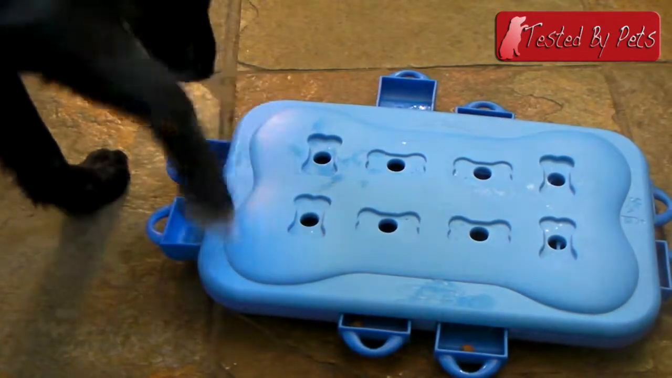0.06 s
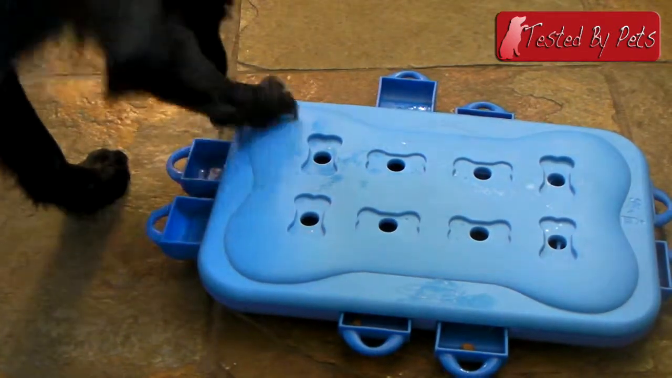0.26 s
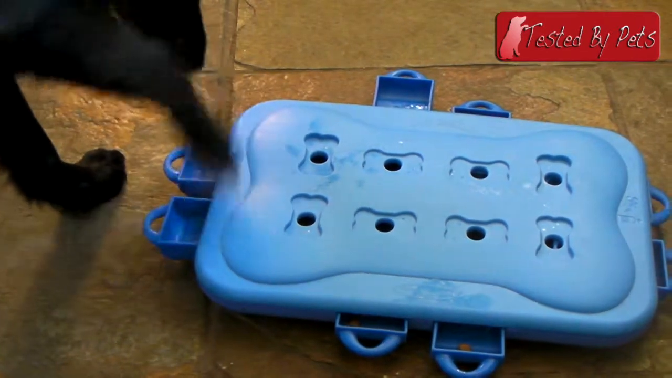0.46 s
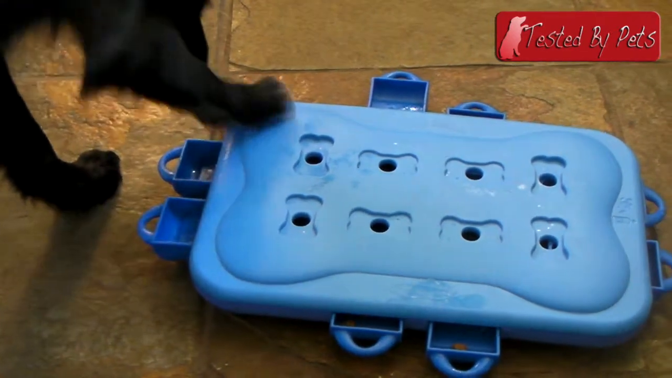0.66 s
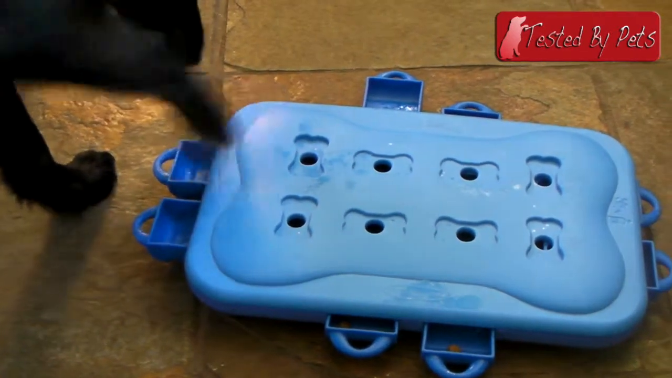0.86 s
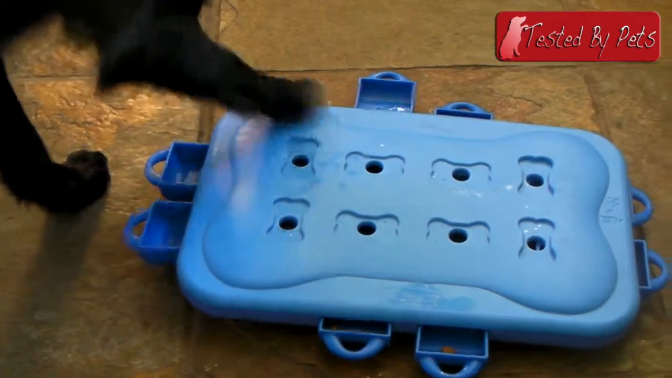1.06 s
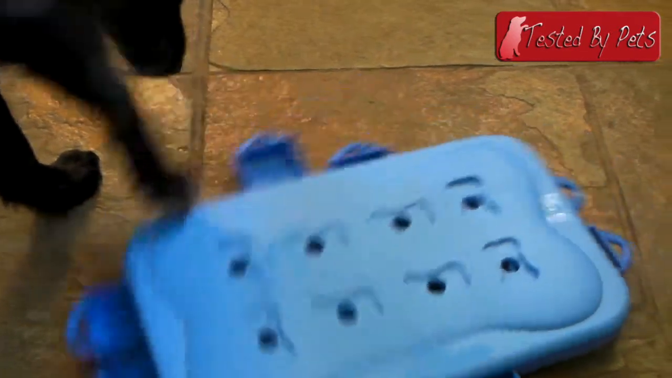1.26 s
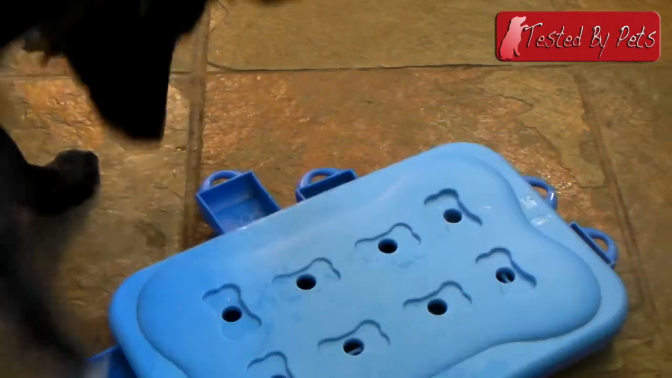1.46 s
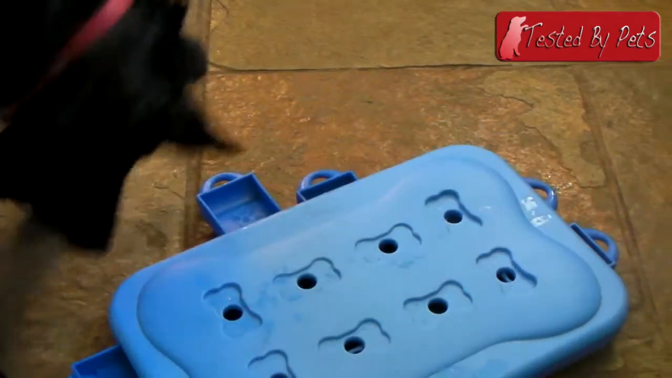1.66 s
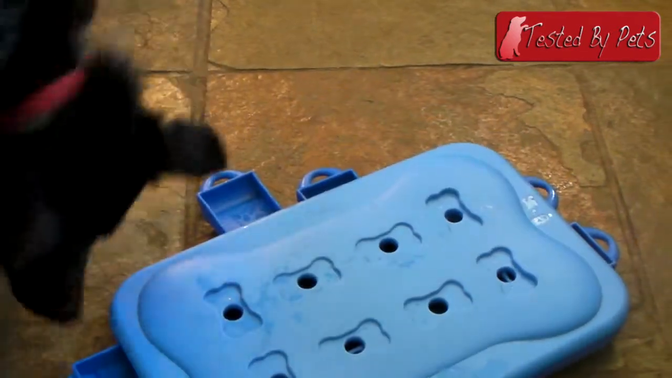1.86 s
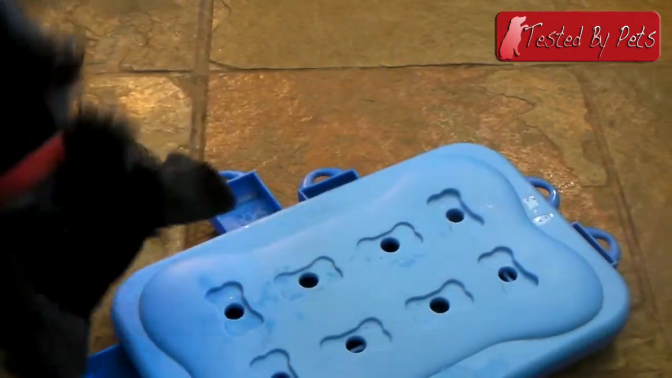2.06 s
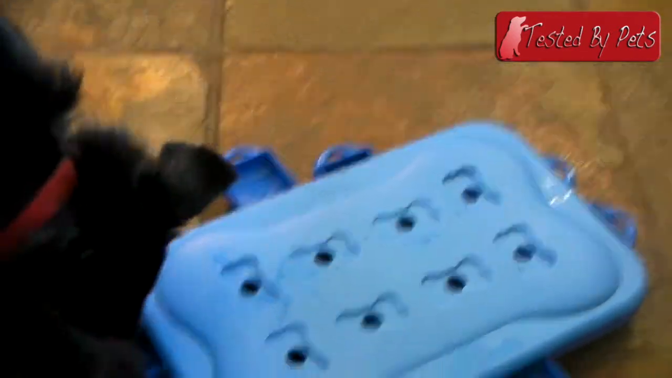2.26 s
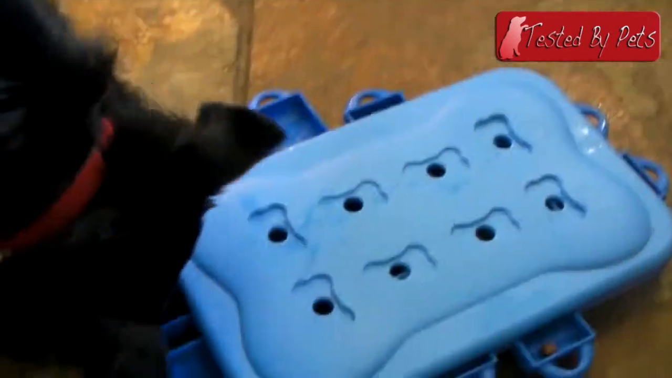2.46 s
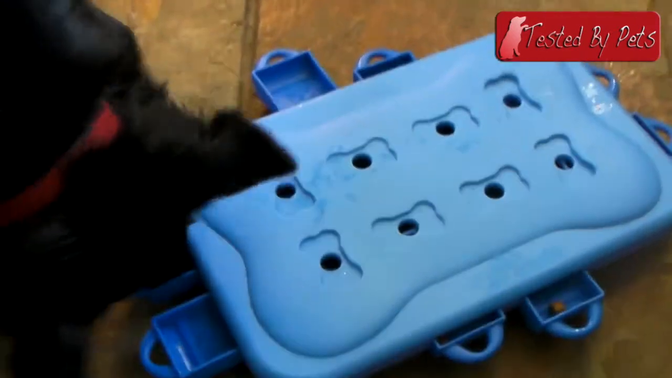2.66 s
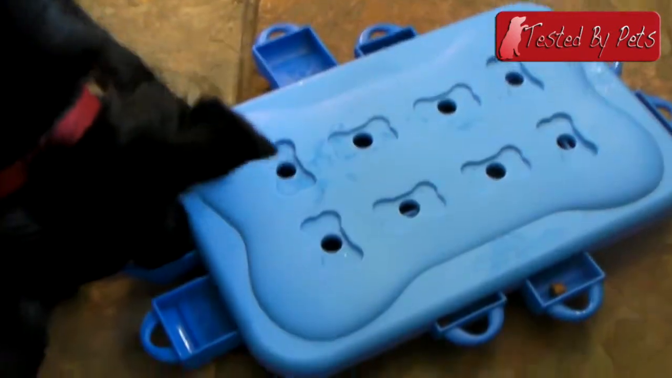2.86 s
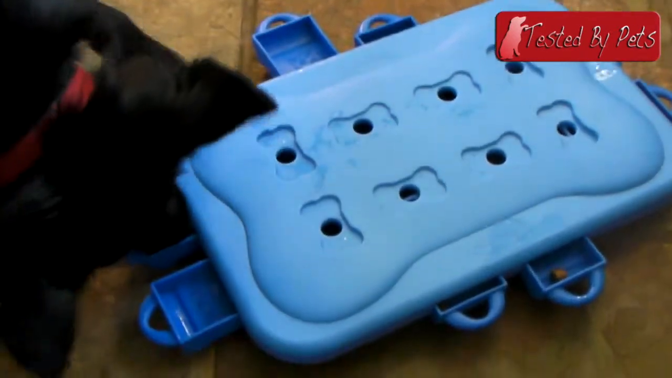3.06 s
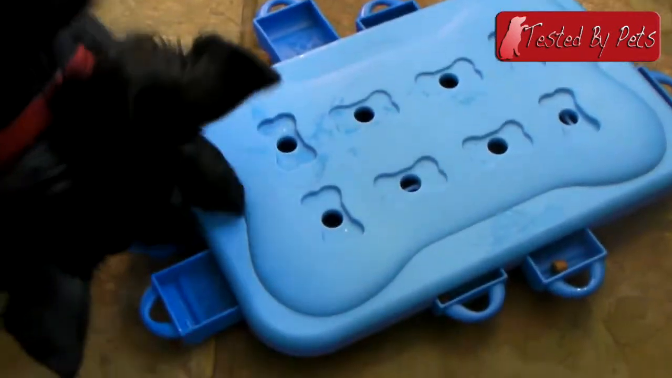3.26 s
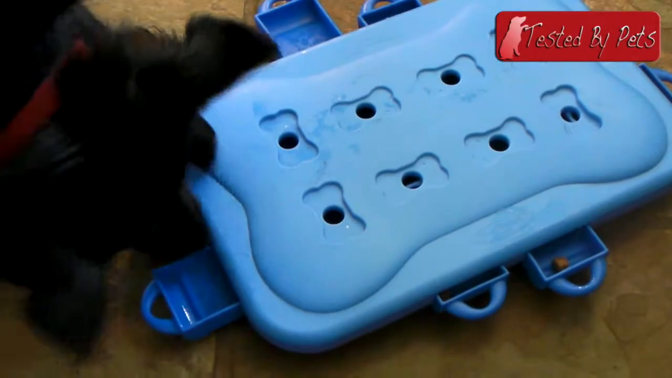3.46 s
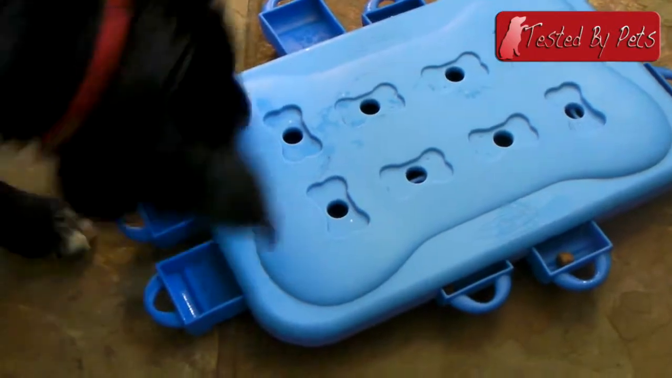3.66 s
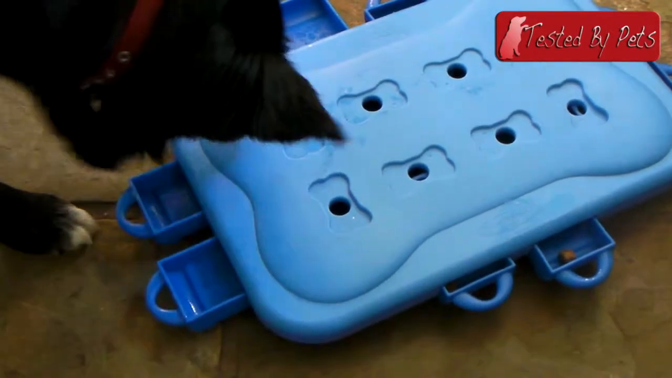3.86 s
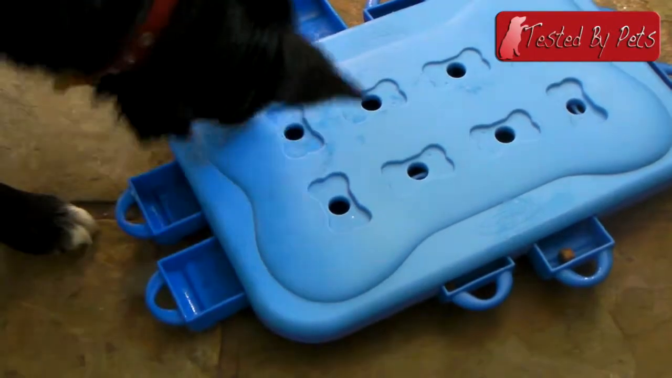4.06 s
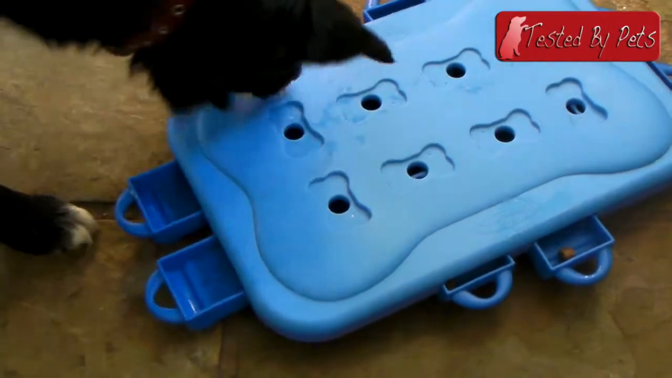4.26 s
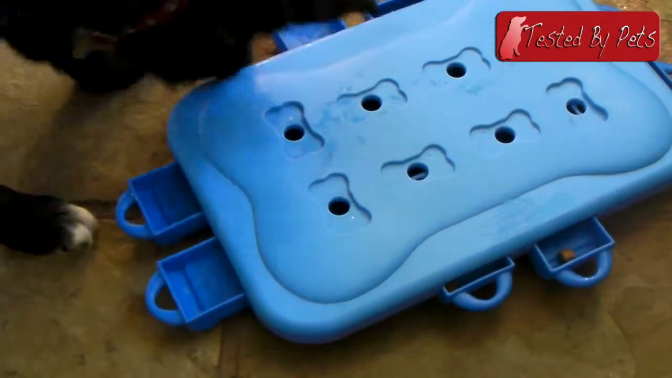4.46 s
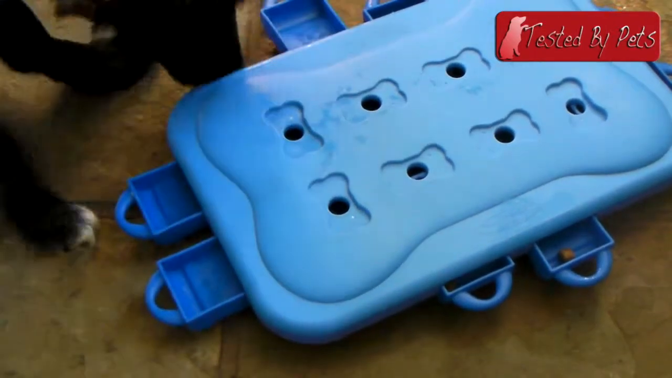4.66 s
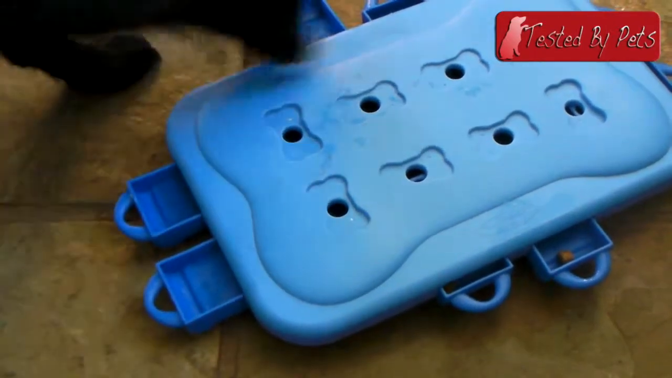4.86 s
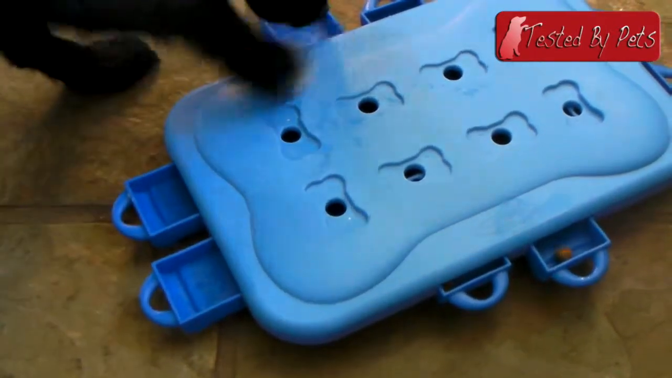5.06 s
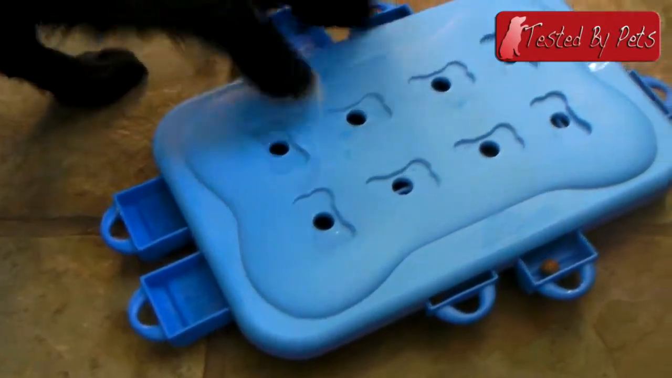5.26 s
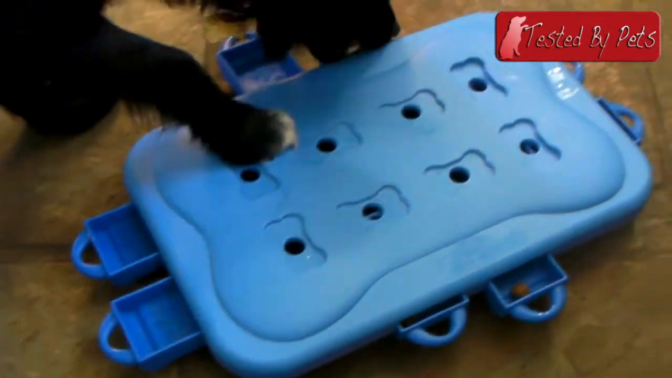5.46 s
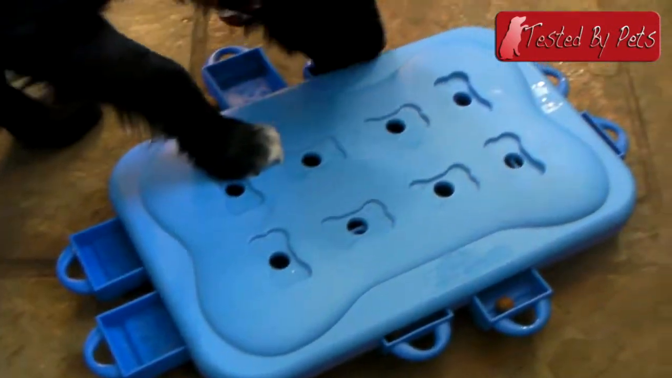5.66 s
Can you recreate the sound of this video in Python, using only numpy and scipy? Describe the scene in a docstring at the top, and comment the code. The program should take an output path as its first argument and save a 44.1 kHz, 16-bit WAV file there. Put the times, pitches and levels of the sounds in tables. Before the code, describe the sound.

Close handheld stereo pickup in a hard, lively room. Claws strike and rake thin plastic repeatedly, drawers chatter, and a collar tag pings once. The board skids and drops on tile, then activity nearly stops apart from tiny ticks, small dry taps and hiss. Isolated plastic clacks return, with soft drawer slides and a final burst of scraping and knocking.

```python
"""A hard, tiled room indoors, where a dog works a hollow plastic puzzle board on the floor. Claws strike and
scrape the plastic and tick on the tiles; drawers rattle and slide, a collar tag rings. The board skids and
drops back on the tiles, and the room rings after each blow. Blows and drops are short pushes into ringing
plastic; scrapes are rough noise that swells and fades. The hand-held camera adds small dry taps and its own
hiss, and low bumps come and go."""
import sys
import numpy as np
from scipy import signal
from scipy.fft import rfft, irfft, next_fast_len
from scipy.io import wavfile
from scipy.ndimage import map_coordinates

SR = 44100
rng = np.random.default_rng(int(sys.argv[2]) if len(sys.argv) > 2 else 0)


def dump_mix(stems):
    """Bounce the given channels to the path in sys.argv[1] as a 16-bit WAV at rate SR."""
    frames = np.atleast_2d(stems).T  # one column per channel
    limited = np.clip(frames, -1, 1)  # hard clip at full scale
    pcm = np.round(limited * 32767).astype(np.int16)
    wavfile.write(sys.argv[1], SR, pcm)


N = 251811  # length in samples
GRAIN_CAP = 4  # largest random grain, in steps of its dB size
SWING_DB = 30  # a swell climbs and a fade falls by this much in its listed time


def amp(db):
    """Turn decibels into a plain gain."""
    return 10 ** (np.asarray(db) / 20)


def unit(x):
    """Scale a signal to an average (rms) strength of one."""
    return x / np.sqrt(np.mean(x ** 2) + 1e-20)


def along(points, hz):
    """Read a curve of (f/Hz, value) points, joined by straight lines on a log pitch axis."""
    f, value = np.transpose(points)
    return np.interp(np.log(hz + 1), np.log(f + 1), value)


def wobble(rate):
    """A smooth random curve with `rate` random points a second."""
    points = rng.standard_normal(int(N * rate / SR) + 4)
    return map_coordinates(points, [np.arange(N) * rate / SR])


def filtered(x, response):
    """Shape the sound x by a response that depends on frequency."""
    size = next_fast_len(N + SR // 2)
    hz = np.fft.rfftfreq(size, 1 / SR)
    return irfft(rfft(x, size) * response(hz), size)[..., :N]


def ringing(modes):
    """Response of a body with several resonances, given as (f/Hz, width/Hz, level/dB)."""
    def response(f):
        total = 0
        for k, (center, width, db) in enumerate(modes):
            sign = (-1) ** k  # neighbours push in opposite directions
            total = total + sign * amp(db) * 1j * f * width / (center * center - f * f + 1j * f * width)
        return total
    return response


def grains(step_db, size):
    """Random gains in which a few grains stand out from many small ones."""
    return amp(step_db * np.minimum(rng.exponential(size=size), GRAIN_CAP))


def slips(lumpy_db, rate, grit_db):
    """Stick-and-slip friction: noise whose strength wanders and whose grains are now and then large."""
    return unit(rng.standard_normal(N) * amp(lumpy_db * wobble(rate)) * grains(grit_db, N))


def swells(peak_s, swell_s, fade_s, db):
    """Gain of overlapping gestures, each climbing to its peak and fading evenly in dB."""
    coarse = np.arange(0, N + 32, 32)  # worked out every 32 samples, then joined up
    late = coarse[:, None] / SR - peak_s
    drop_db = SWING_DB * np.maximum(late / fade_s, -late / swell_s)
    power = amp(2 * (db - drop_db)).sum(axis=1)
    return np.interp(np.arange(N), coarse, np.sqrt(power))


def stereo(pair, alike):
    """Left and right from two unrelated signals, as alike at each pitch as the table says."""
    turn = lambda hz: np.arccos(np.clip(along(alike, hz), -1, 1)) / 2
    mid, side = filtered(pair, lambda hz: np.array([np.cos(turn(hz)), np.sin(turn(hz))]))
    return np.array([mid + side, mid - side])


# Claw blows: t/s, level/dB, treble share level/dB, note of the struck panel f/Hz, note level/dB
BLOWS = [(0.0109, -17, -16.5, 3615, -2.5), (0.236, -6, -17.5, 2514, -15), (0.2446, -11, -11.5, 1882, -8),
         (0.5919, -8.5, -12, 2102, -4.5), (0.5952, -6.5, -16, 2033, -11), (0.6025, -18.5, -2, 4370, -7.5),
         (0.6118, -17, -17, 3520, -4.5), (0.7342, -20.5, -13, 2083, -4.5), (0.9564, -4.5, -16.5, 2091, -1),
         (0.9628, -11, -1.5, 2097, -7), (0.9755, -21, -5.5, 3664, 4.5), (1.2411, -21, -13, 1406, 2),
         (1.3148, -20, -6, 1714, -2.5), (1.421, -19.5, -33, 1710, -21), (1.5918, -21, -15, 2488, -8),
         (2.0607, -45, -25, 2396, 1.5), (2.0972, -34.5, -20, 1494, 0), (2.395, -34, -23, 1430, 1.5),
         (2.409, -51.5, -31, 702, 13.5), (2.8877, -16.5, -11.5, 1456, -10.5),
         (3.0646, -13.5, -14, 1912, -5.5), (3.3142, -22, -3, 3290, -5.5), (3.331, -12, -11, 1482, -5),
         (3.8, -19, -32.5, 2603, -14), (3.8312, -13.5, -43.5, 1564, -12),
         (3.869, -15.5, -14.5, 2364, -17.5), (4.237, -12.5, -11, 2614, -13),
         (4.247, -38.5, -16, 2770, -21.5), (4.4586, -46, 8.5, 1366, 1), (4.763, -46, 2, 3086, -0.5),
         (4.9611, -7.5, -17, 2755, -15.5), (4.9673, -14.5, -22.5, 3055, -3.5),
         (4.9779, -21.5, -8.5, 2090, -8), (5.3671, -15, -7.5, 1131, -8.5), (5.385, -24, -18.5, 1146, -6),
         (5.4361, -23, -15, 2737, -9.5), (5.587, -32.5, -24, 2676, -1)]
# Low resonances of the plastic shell: f/Hz, width/Hz, level/dB
SHELL = [(1455, 102.6, -3), (2118, 106, -1.5), (2509, 417, -3), (3690, 925, -3)]
# Resonances of its stiff edge: f/Hz, width/Hz, level/dB
RIM = [(4690, 1403, 5.5), (5784, 1483, 9), (6483, 1178, 10), (11840, 11200, -10)]
PANEL_DRIFT = 16  # a panel's phase wanders under the claw, radians per root second


def blows():
    """Each claw lands as milliseconds of chattering contact that ring shell, edge and the panel it hits."""
    force, t = np.zeros((3, N + SR)), np.arange(SR // 10) / SR
    # a sharp start over two weaker, longer tails
    shape = amp(1.0 - 60 * t / 0.00183) + amp(-9 - 60 * t / 0.0576) + amp(-16 - 60 * t / 0.151)
    panel_shape = (1 - np.exp(-t / 0.0003)) * amp(-1.5 - 60 * t / 0.04)
    for s, db, treble_db, note_hz, note_db in BLOWS:
        chatter = np.sign(rng.standard_normal((2, len(t))))
        shell_push, rim_push = shape * chatter * grains(2.826, (2, len(t)))
        drift = PANEL_DRIFT * np.sqrt(1 / SR) * np.cumsum(rng.standard_normal(len(t)))
        panel = np.sin(2 * np.pi * note_hz * t + drift) * panel_shape
        gains = amp([[db + 1.5], [db + treble_db + 6.5], [db + note_db]])
        force[:, round(s * SR):][:, :len(t)] += gains * np.array([shell_push, rim_push, panel])
    shell_push, rim_push, panels = force[:, :N]
    return filtered(shell_push, ringing(SHELL)) + filtered(rim_push, ringing(RIM)) + panels


# Paw strokes, which also shake the drawers: peak t/s, swell t/s, fade t/s, claws level/dB, drawers level/dB
STROKES = [(.01, 0.0327, 0.16, -24, -62.5), (.06, 0.061, 0.157, -29, -34.5),
           (0.242, 0.0502, 0.159, -24, -37.5), (0.407, 0.048, 0.126, -22, -36.5),
           (0.6, 0.0436, 0.143, -25.5, -35), (0.761, 0.066, 0.154, -22.5, -46),
           (.81, 0.115, 0.132, -26.5, -36), (0.965, 0.0381, 0.219, -23, -26),
           (1.13, 0.036, 0.163, -32, -37), (1.32, 0.262, 0.162, -32, -35.5),
           (1.41, 0.0346, 0.42, -33.5, -41), (1.68, 0.059, 0.075, -43, -70),
           (1.85, 0.42, 0.137, -51.5, -86), (2.245, 0.0425, 0.163, -40.5, -79.5),
           (2.89, 0.046, 0.094, -41.5, -44.5), (3.065, 0.244, 0.1804, -34.5, -40),
           (3.322, 0.074, 0.611, -39.5, -39), (3.643, 0.0424, 0.445, -39, -45),
           (3.831, 0.122, 0.217, -32.5, -38), (4.247, 0.043, 0.213, -33, -40.5),
           (4.47, 0.083, 0.13, -46, -72), (4.97, 0.0366, 0.389, -32, -32.5),
           (5.177, 0.183, 0.0556, -30.5, -33), (5.371, 0.0284, 0.1006, -26.5, -35),
           (5.44, 0.049, 0.13, -44, -44)]
# Tone of claws on plastic: f/Hz, level/dB
SCRATCH = [(300, -8.5), (1500, -6.5), (2500, -2.5), (4000, 2), (6500, 4.5), (9000, 2.5), (11000, -6.5),
           (13000, 5), (16000, -4)]
# Resonances of the drawers: f/Hz, width/Hz, level/dB
SLOT = [(1049.5, 157, -0.5), (1435, 147, 0.5), (1715, 181, 5), (2400, 1413, -0.5)]


def strokes():
    """Claws scratch over the shell with rough friction, and the same strokes make the drawers chatter."""
    claw = unit(filtered(slips(2.3, rate=170, grit_db=3.5), lambda hz: amp(along(SCRATCH, hz))))
    drawer = unit(filtered(slips(2.2, rate=200, grit_db=4), ringing(SLOT)))
    s, swell, fade, claw_db, drawer_db = np.transpose(STROKES)
    return swells(s, swell, fade, claw_db) * claw + swells(s, swell, fade, drawer_db) * drawer


# Drawers pulled along their slots:
# peak t/s, swell t/s, fade t/s, level/dB, cavity resonance f/Hz, glide/(octaves a second)
SLIDES = [(0.068, 0.0149, 0.0695, -29.5, 1471, 0.97), (2.08, 0.2, 0.26, -50.5, 853.2, 0.018),
          (3.05, 0.11, 0.095, -46, 1021, -0.16), (3.079, 0.0705, 0.158, -41, 1906, 0.19),
          (3.3, 0.057, .1, -55.5, 1409, -0.079), (3.395, .16, .14, -49, 1520, 0.18),
          (3.426, .06, 0.11, -40, 1368, 0.947), (3.485, 0.217, 0.22, -39, 1475, -0.11),
          (3.64, 0.0505, 0.135, -55, 1529, 0.076), (4.312, .04, 0.081, -43.5, 1897, 0.059),
          (3.48, .05, 0.04, -40, 1054, -0.15), (5.03, 0.11, 0.054, -32, 470, 0.38),
          (5.035, .04, 0.039, -34, 1400, -0.13), (5.089, .1, 0.121, -30.5, 992.7, 0.969),
          (5.174, 0.057, 0.028, -41.5, 1895, -0.13)]
HUM = 1.15  # steady share of a sliding cavity's note, over its chatter
WAVER = 0.036  # size of a sliding cavity's random pitch wander, octaves


def slides():
    """The cavity changes pitch as a drawer moves: narrow noise carried on the moving resonance."""
    force = np.array([slips(1.5, rate=60, grit_db=3), slips(1.5, rate=60, grit_db=3)])
    even, odd = unit(filtered(force, lambda hz: 1 / (1 + 1j * hz / 130) ** 2))  # slow chatter only
    chatter = (HUM + even + 1j * odd) * np.sqrt(2 / (HUM ** 2 + 2))
    out, wander = np.zeros(N), WAVER * wobble(30)
    for s, swell, fade, db, cavity_hz, glide in SLIDES:
        moving_s = np.clip(np.arange(N) / SR - s, -swell, fade)
        pitch = cavity_hz * 2 ** (glide * moving_s + wander)
        note = np.exp(2j * np.pi * np.cumsum(pitch) / SR)
        out += swells(s, swell, fade, db) * np.real(chatter * note)
    return out


# Resonances of the hollow board: f/Hz, width/Hz, level/dB
HOLLOW = [(471.8, 88.9, 1), (597.5, 38.5, 2.5), (717.9, 130.5, 3), (818.5, 60.6, 4), (898, 61.9, 1.5),
          (1058, 190, 0.5), (1346, 306, 0), (2560, 2520, -7.5), (4010, 9050, -17)]


def hollow_board():
    """The board as a hollow body: the response that skids and drops set ringing."""
    return ringing(HOLLOW)


# The board skids on the tiles: peak t/s, swell t/s, fade t/s, level/dB
SKIDS = [(.05, 0.206, 0.298, -38.5), (.335, 0.205, 0.386, -35), (.6, 0.041, 0.42, -34.5),
         (.79, 0.056, 0.175, -32.5), (.97, 0.059, 0.08, -37.5), (1.048, 0.055, 0.145, -32),
         (1.16, 0.18, 0.162, -34), (1.24, 0.0746, 0.366, -29), (1.297, 0.063, 0.076, -23),
         (1.32, 0.0364, 0.092, -21.5), (1.339, 0.05, 0.188, -24.5), (1.424, 0.0386, 0.0467, -21),
         (1.47, 0.097, 0.1385, -28.5), (2.09, 0.188, 0.222, -54), (2.419, 0.095, 0.091, -46),
         (2.889, 0.0336, 0.374, -42), (3.339, 0.113, 0.598, -45.5), (3.85, 0.8, 0.18, -52),
         (3.948, 0.104, 0.21, -50), (4.25, 0.046, 0.588, -49), (4.99, 0.043, 0.354, -37),
         (5.039, 0.059, 0.1694, -25.5), (5.445, 0.0566, 0.1945, -35), (5.66, 0.58, 0.158, -50)]


def skids():
    """The board skids over the tiles, and the friction rings its hollow body."""
    skid = unit(filtered(slips(2.1, rate=190, grit_db=4.5), hollow_board()))
    return swells(*np.transpose(SKIDS)) * skid


# The board drops back on the tiles: t/s, level/dB
THUDS = [(0.032, -30), (0.32, -31), (0.413, -32), (0.679, -32), (0.769, -32.5), (1.021, -30.5),
         (1.243, -26.5), (1.292, -24), (1.414, -23), (2.408, -33.5), (2.896, -31), (3.843, -28),
         (3.952, -38), (4.375, -46), (4.99, -29.5), (5.034, -36), (5.437, -27.5)]


def thuds():
    """The board meets the floor with a short push, then rocks to rest; both drive its hollow body."""
    force, t = np.zeros(N + SR), np.arange(SR // 10) / SR
    rocking = (1 - np.exp(-t / 0.00095)) * amp(-60 * t / 0.0982)
    for s, db in THUDS:
        contact = 5 * amp(-60 * t / 0.000439) + rocking * rng.standard_normal(len(t))
        force[round(s * SR):][:len(t)] += amp(db + 6) * unit(contact)
    soft = lambda hz: 1 / (1 + 1j * hz / 900) ** 2  # dulls the push above 900 Hz
    return filtered(force[:N], lambda hz: soft(hz) * hollow_board()(hz))


# Claw tips on the tiles: t/s, level/dB
TICKS = [(1.6624, -25.5), (1.673, -35.5), (1.682, -32.5), (1.714, -32), (1.8618, -34), (2.1516, -39.5),
         (2.25, -26), (3.8703, -18)]
TICK_S, TICK_HZ, TICK_DB = 0.005, 3600, 6  # time to fall 60 dB (s), weak below (Hz), added force (dB)


def ticks():
    """A hard tip on hard tile: one very short, dry and bright crack."""
    force, t = np.zeros(N + SR), np.arange(SR // 50) / SR
    for s, db in TICKS:
        crack = np.sign(rng.standard_normal(len(t)))
        force[round(s * SR):][:len(t)] += amp(db + TICK_DB - 60 * t / TICK_S) * crack
    return filtered(force[:N], lambda hz: (1j * hz / (TICK_HZ + 1j * hz)) ** 2)


# Notes of the metal collar tag: f/Hz, level/dB, time to fall 60 dB t/s
TAG = [(5530, -36, 0.49), (5835, -50, .3), (6901, -38, 0.235), (11930, -23, 0.335)]
TAG_S = .754  # when it is struck, s


def tag():
    """The collar tag is knocked once and rings thinly, as a few fading pure notes."""
    t = np.clip(np.arange(N) / SR - TAG_S, 0, None)  # the notes are silent until the knock
    return sum(amp(db - 60 * t / t60) * np.sin(2 * np.pi * hz * t) for hz, db, t60 in TAG)


# Likeness of left and right in the direct sound: f/Hz, likeness (1 = the same)
NEAR_ALIKE = [(1000, 0.947), (3000, 0.971), (6000, 0.439), (12000, 0.071)]


def near(x, piece=0.21):
    """The direct sound; its treble scatters off the floor, differently at the two ports and as the paw moves."""
    size, t = int(piece * SR), np.arange(SR // 50) / SR
    scattered = np.zeros(N + SR)
    for start in range(0, N, size):  # a new scatter for every piece (s)
        scatter = rng.standard_normal(len(t)) * amp(-60 * t / 0.0113)
        part = np.convolve(x[start:start + size], scatter / np.linalg.norm(scatter))
        scattered[start:start + len(part)] += part
    return stereo(np.array([x, scattered[:N]]), NEAR_ALIKE)


# How long the room rings: f/Hz, time to fall 60 dB t/s
ROOM = [(400, 0.195), (1000, 0.417), (2100, 0.291), (5500, 0.44), (14000, 0.283)]
# Likeness of left and right in the room's ringing: f/Hz, likeness (1 = the same)
ROOM_ALIKE = [(100, 0.27), (400, 1), (1200, 1), (2500, 0.948), (4500, 0.71), (8000, 0.066), (14000, 0.14)]


def room(x, piece=.3):
    """Diffuse stereo tail; each stretch of sound gets its own, as the source keeps moving."""
    size, delay = int(piece * SR), 200  # samples
    out = np.zeros((2, N + 2 * SR))
    for start in range(0, N, size):
        hz, t, bands = signal.stft(rng.standard_normal((2, SR // 2)), SR, nperseg=256)
        fading = bands * amp(-60 * t / along(ROOM, hz)[:, None])  # each pitch dies at its own pace
        tail = signal.istft(fading, SR, nperseg=256)[1]
        wet = signal.fftconvolve(x[None, start:start + size], tail / np.linalg.norm(tail[0]), axes=1)
        out[:, start + delay:start + delay + wet.shape[1]] += wet
    return stereo(out[:, :N], ROOM_ALIKE)


# Dry taps on the camera body: t/s, level/dB, thump level/dB, pitch f/Hz
TAPS = [(2.0, -37, -28, 932), (2.062, -33, -25.5, 816), (2.123, -34.5, -26.5, 917), (2.211, -32, -26, 870),
        (2.265, -32, -34.5, 947), (2.276, -35.5, -40, 720), (2.706, -43, -26, 863),
        (2.723, -43, -25.5, 966), (2.758, -38.5, -33, 872), (2.823, -37.5, -26.5, 850),
        (2.858, -37, -28.5, 877), (4.804, -46.5, -28, 891), (5.237, -22.5, -27, 878),
        (5.6427, -29, -30, 1176)]


def taps():
    """Fingers tap the camera body: a short note, a low thump and a snap of noise."""
    out, t = np.zeros(N + SR), np.arange(SR // 20) / SR
    soft = 1 - np.exp(-t / 0.00239)  # gentle start
    for s, db, thump_db, tap_hz in TAPS:
        tick = np.sin(2 * np.pi * tap_hz * t) * amp(-60 * t / 0.00976)
        thump = np.sin(2 * np.pi * 110 * t) * amp(thump_db + 6.0 - 60 * t / 0.0295)
        snap = 0.061 * rng.standard_normal(len(t)) * amp(-60 * t / 0.0022)
        out[round(s * SR):][:len(t)] += amp(db + 11.5) * (soft * (tick + thump) + snap)
    return out[:N]


# Low bumps: peak t/s, level/dB, fade t/s
BUMPS = [(0, -46.5, 0.089), (.14, -49, 0.094), (.24, -46.5, 0.266), (.32, -55, 0.083),
         (.47, -47.5, 0.204), (.6, -39.5, 0.215), (.69, -45.5, 0.041), (.85, -54.5, 0.246),
         (1.19, -52, 0.091), (1.56, -50.5, 0.134), (2.13, -50.5, 0.074), (2.21, -64.5, .08),
         (2.27, -48, 0.076), (2.42, -55, 0.185), (2.89, -48, 0.5), (3.069, -47.5, 0.059),
         (3.32, -47.5, 0.27), (3.45, -53, 0.82), (3.83, -46, 0.042), (3.92, -47.5, 0.129),
         (4.25, -49, 0.105), (4.35, -61, 0.41), (4.98, -46, 0.116), (5.249, -43, 0.0216),
         (5.38, -45, 0.102), (5.5, -54, 0.255), (5.65, -59, 0.12)]
# Tone of the bumps: f/Hz, level/dB
BUMP_TONE = [(15, -4.5), (30, -8), (60, -0.5), (130, 0), (220, -3), (350, -17)]
BUMP_SWELL_S = 0.0706  # swell of each bump, s


def low_bumps():
    """Low bumps: lumpy noise that swells and fades."""
    s, db, fade = np.transpose(BUMPS)
    lumps = rng.standard_normal((2, N)) * amp(2.12 * wobble(24.97))
    low = filtered(lumps, lambda hz: amp(along(BUMP_TONE, hz)))
    bumps = unit(stereo(low, [(25, 1.0), (125, 0.905)]))
    return swells(s, BUMP_SWELL_S, fade, db) * bumps


# Tone of the hiss: f/Hz, level/dB
HISS = [(15, -49.5), (40, -29.5), (70, -15.5), (154, -8), (259, -14.5), (433, 1), (560, -5.5), (900, -8),
        (1930, -12), (6400, -15.5), (9000, -14.5), (11000, -20), (15000, 1.5)]
# Likeness of left and right in the hiss: f/Hz, likeness (1 = the same)
HISS_ALIKE = [(100, 0.35), (500, 0.041), (2000, 0.027), (6000, 0.047), (14000, 0.096)]


def hiss():
    """The camera's own noise, wavering slightly in level."""
    noise = filtered(rng.standard_normal((2, N)), lambda hz: amp(along(HISS, hz)))
    return amp(-43.5 + 0.283 * wobble(5.28)) * unit(stereo(noise, HISS_ALIKE))


def camera():
    """Taps on the camera body and low bumps, with no room, over the camera's hiss."""
    return taps() + low_bumps() + hiss()


# The bass is cut away below about 400 Hz: f/Hz, level/dB
LOW_CUT = [(200, -44.5), (300, -12.5), (400, -8.5), (470, -2)]


def scene():
    """Mix the board's direct sound, its ringing in the room, the low bumps and the camera's taps and hiss."""
    sources = np.array([strokes() + skids() + slides(), blows() + thuds()])
    rub, hit = filtered(sources, lambda hz: amp(along(LOW_CUT, hz)))
    direct = near(amp(3.0) * rub + hit + tag()) + ticks()
    wet = room(amp(-8.5) * rub + amp(-5.5) * hit)
    return (direct + wet + camera()) * amp([[.5], [-.5]])  # left a touch louder than right


# Colour of the whole sound, a deep notch near 8 kHz with weak treble above it: f/Hz, level/dB
COLOUR = [(6800, 0), (7350, -4.5), (7650, -24.5), (7950, -99), (8250, -20.5), (8800, -7), (16000, -16.5)]
TOP_HZ = 16050  # nothing passes from here up
CEILING = 0.52  # the limit that squashed peaks approach


def record(dry):
    """The input stage rounds off the loudest blows; then the notched colour and the band limit."""
    squashed = CEILING * np.tanh(dry / CEILING)
    return filtered(squashed, lambda hz: amp(along(COLOUR, hz)) * (hz < TOP_HZ))


dry = scene()
out = record(dry)
dump_mix(out)
```